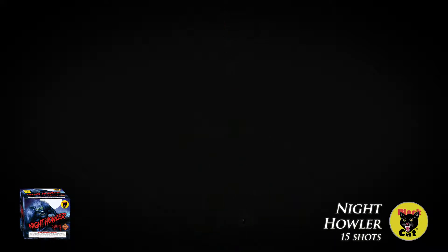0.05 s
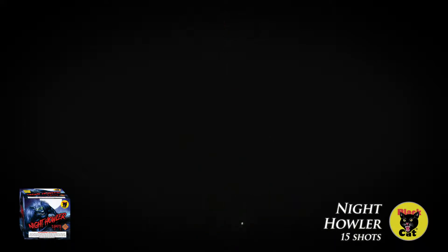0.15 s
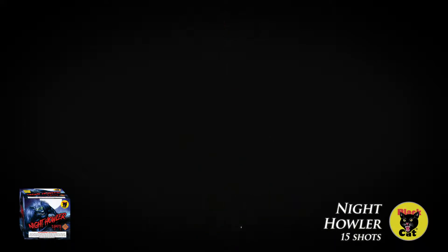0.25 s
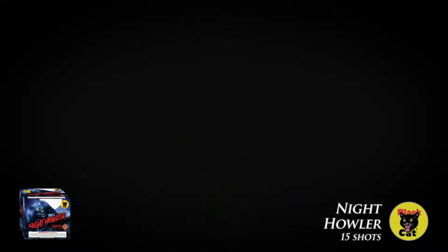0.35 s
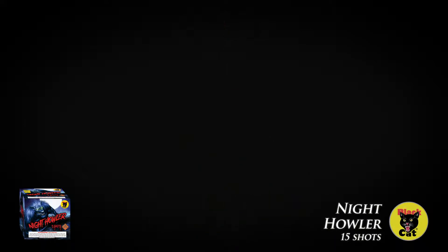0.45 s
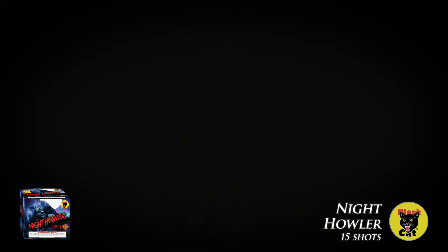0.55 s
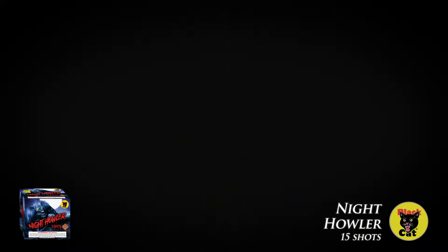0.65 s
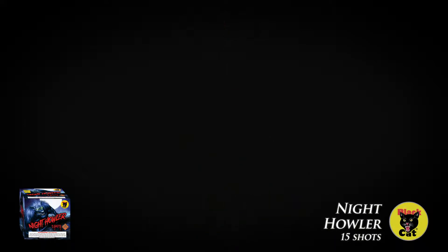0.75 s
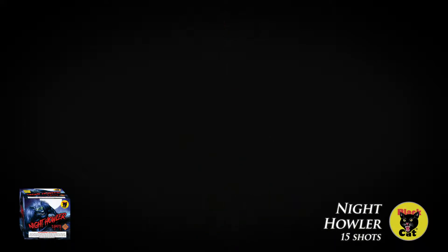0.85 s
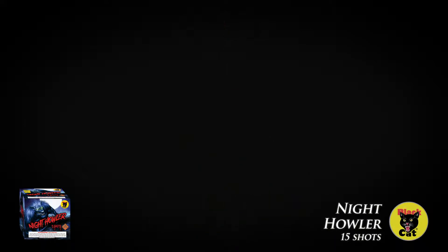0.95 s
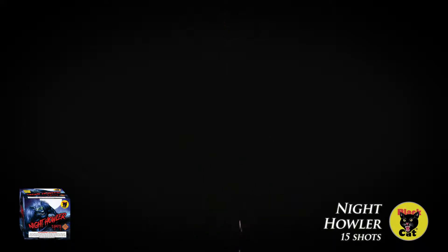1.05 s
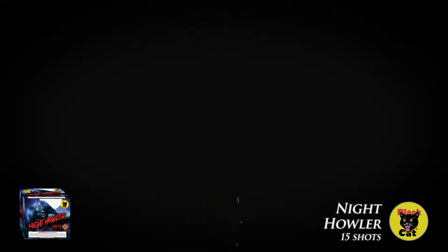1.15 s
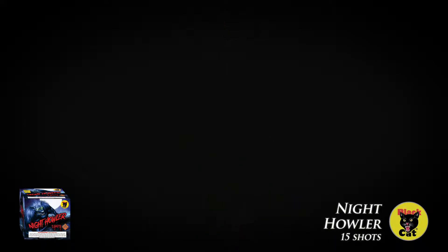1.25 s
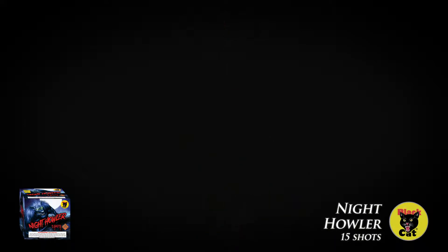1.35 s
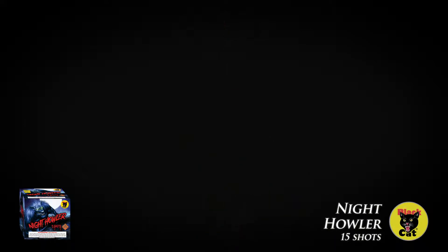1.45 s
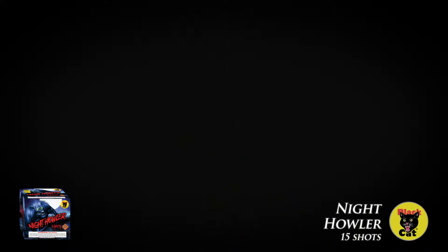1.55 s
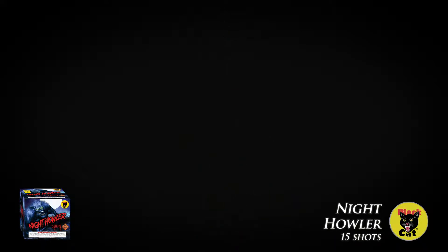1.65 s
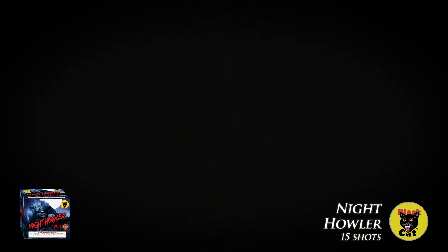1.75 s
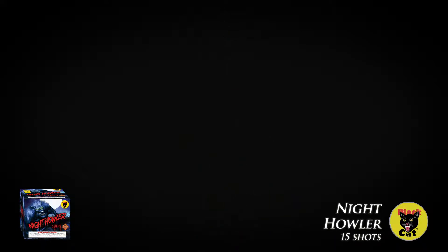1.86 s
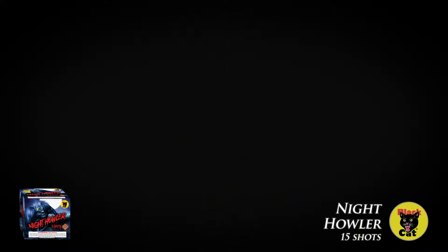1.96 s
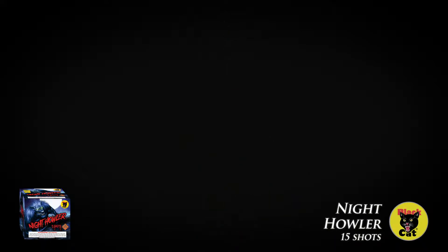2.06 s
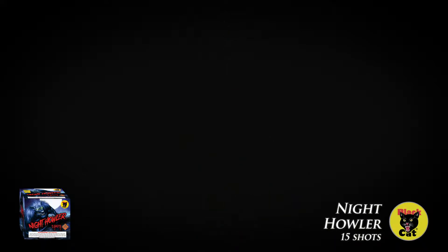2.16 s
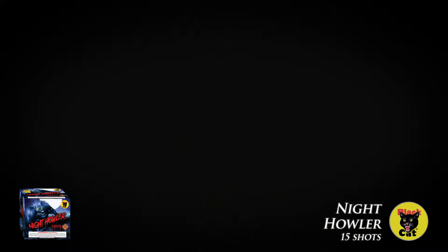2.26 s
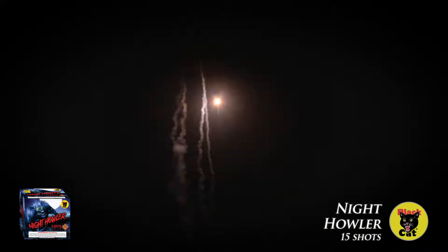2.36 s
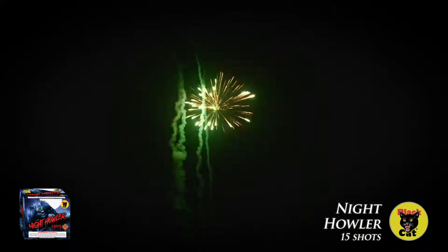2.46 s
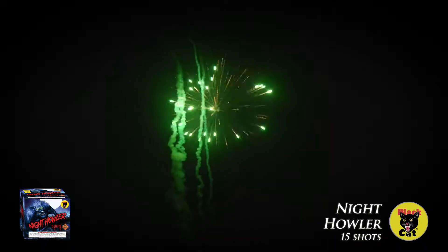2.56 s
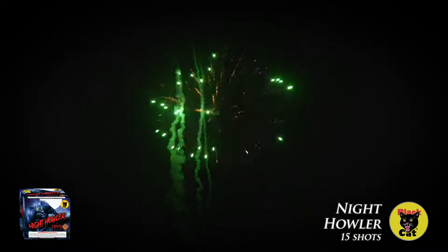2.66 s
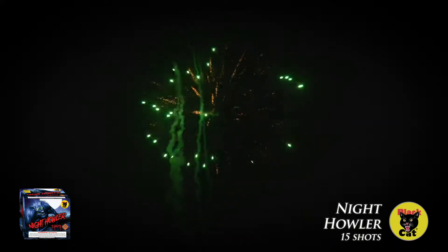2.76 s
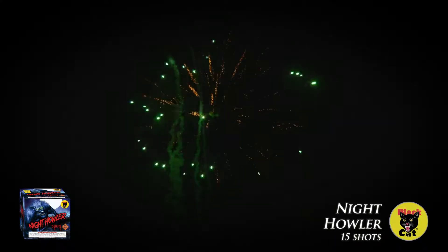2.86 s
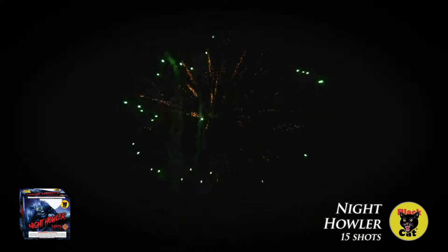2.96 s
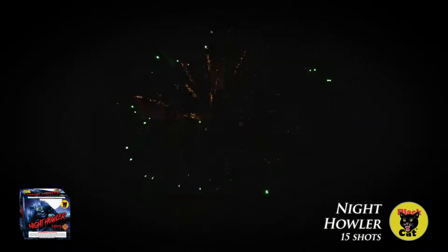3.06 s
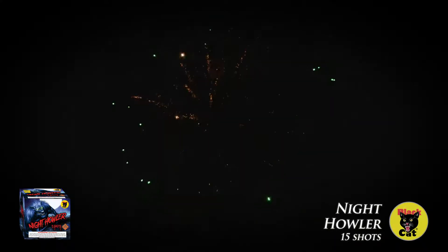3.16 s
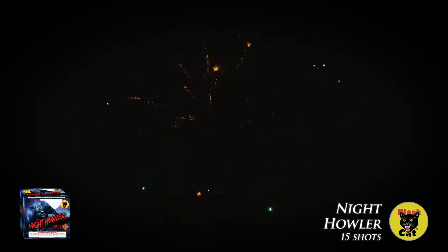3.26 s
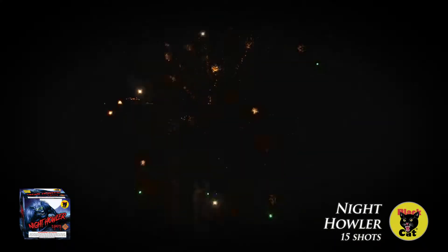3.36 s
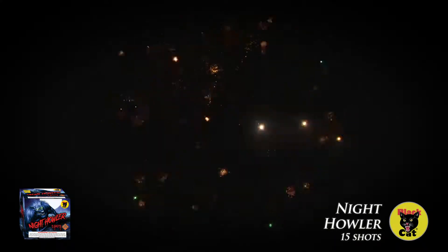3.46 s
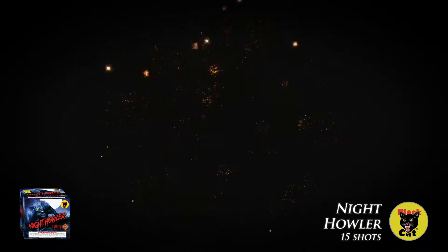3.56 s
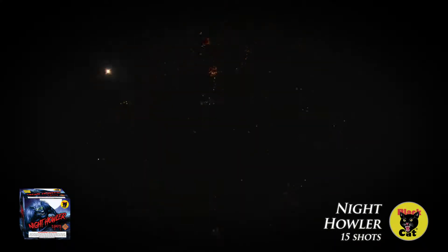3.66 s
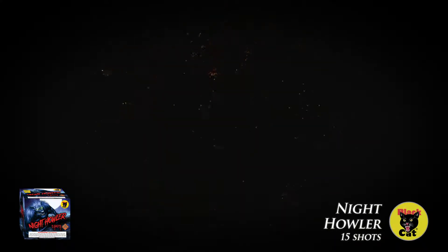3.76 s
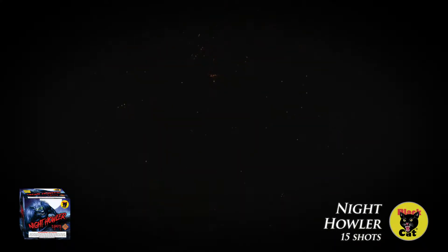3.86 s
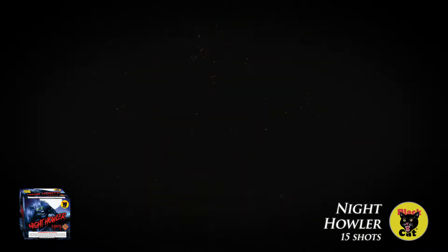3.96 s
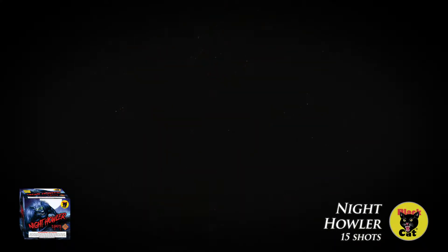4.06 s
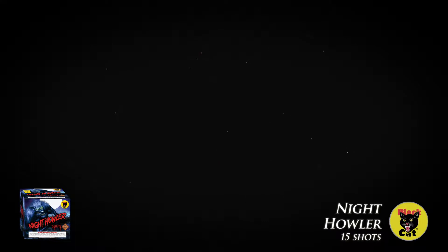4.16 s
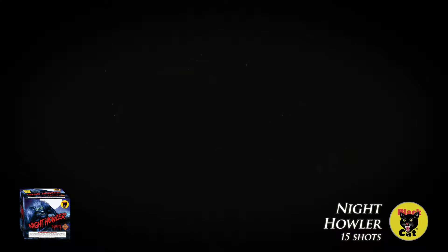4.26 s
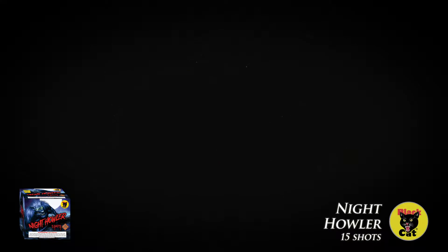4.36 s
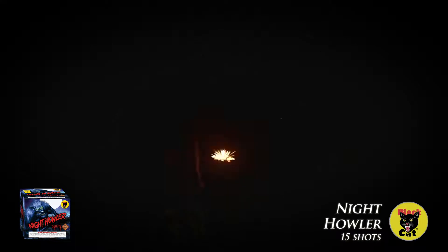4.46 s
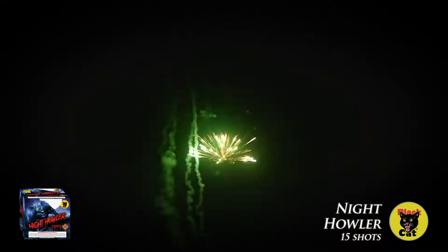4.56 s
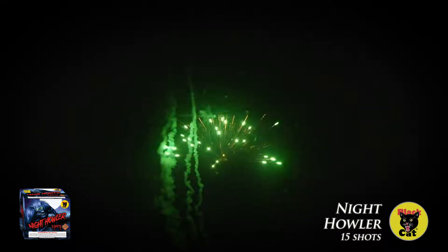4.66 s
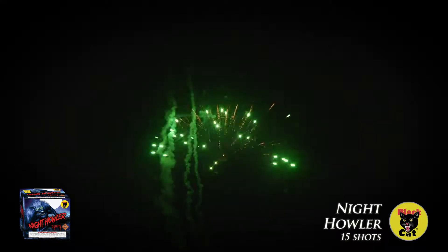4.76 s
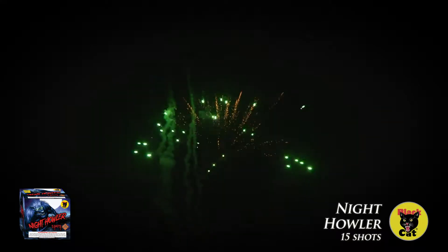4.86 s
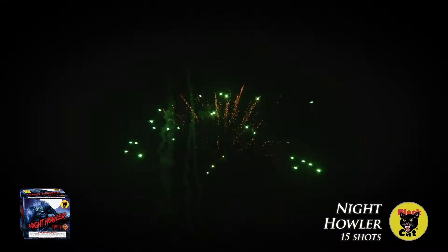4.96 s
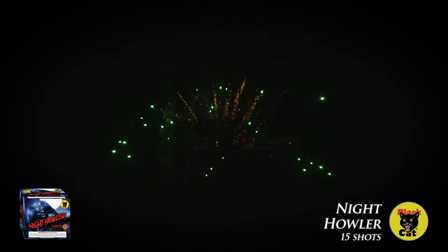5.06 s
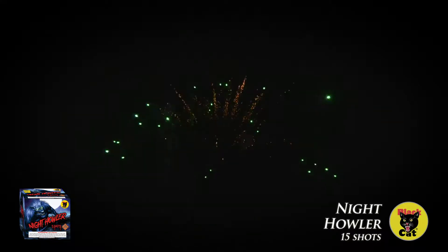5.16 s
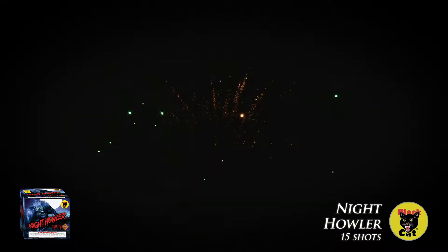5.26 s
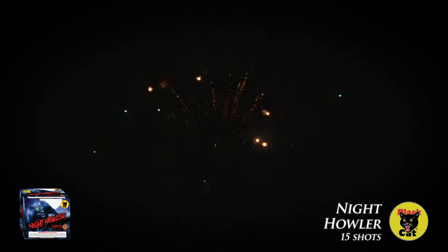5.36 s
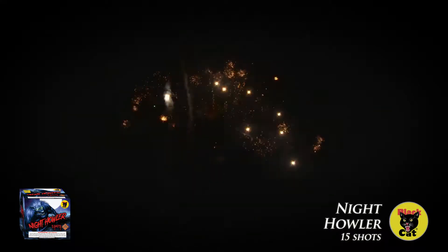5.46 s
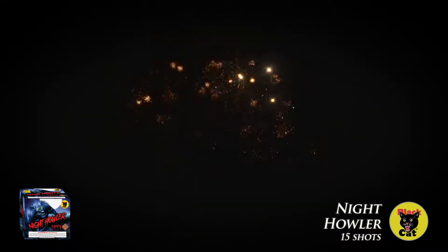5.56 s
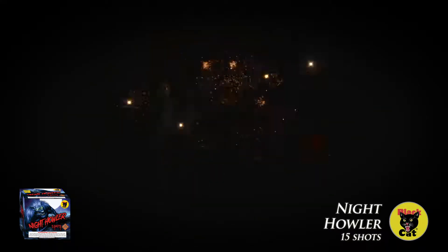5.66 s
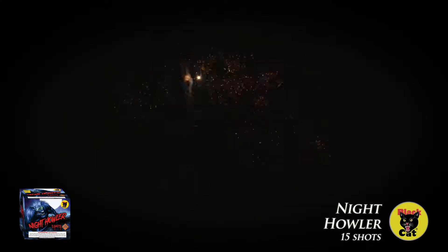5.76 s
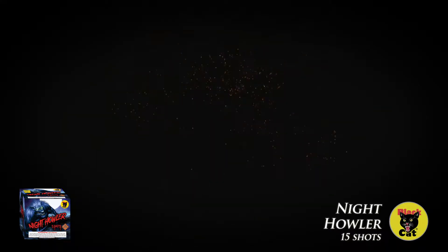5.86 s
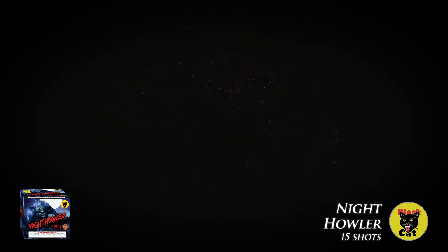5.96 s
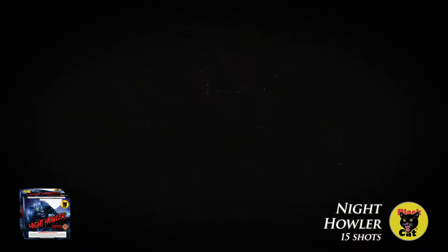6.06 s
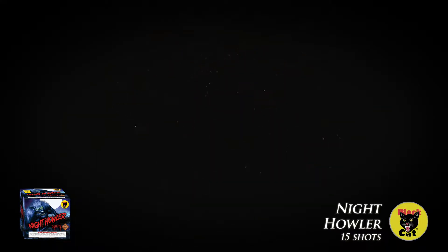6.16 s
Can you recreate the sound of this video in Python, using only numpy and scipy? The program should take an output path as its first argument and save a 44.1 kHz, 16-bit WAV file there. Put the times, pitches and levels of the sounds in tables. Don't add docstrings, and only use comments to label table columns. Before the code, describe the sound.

A fading whistle over night insects, then firework thumps, two huge overloaded bursts and dense sharp crackling, echoing across an open field.

```python
import sys
import numpy as np
from scipy import signal
from scipy.io import wavfile

SR = 44100
rng = np.random.default_rng(int(sys.argv[2]) if len(sys.argv) > 2 else 0)


def file_out(sig):
    cols = np.atleast_2d(sig).T
    lim = np.clip(cols, -1, 1)
    pcm = np.round(lim * 32767).astype(np.int16)
    wavfile.write(sys.argv[1], SR, pcm)


def magnitude_from_level(level_db):
    exponent = np.asarray(level_db, float) / 20
    return 10 ** exponent


N = 273420


def lifts():
    # f/Hz, level/dB per Hz, t60/s
    lift_return = [(70, -33, .7), (155, -33, 1.01), (276, -33.5, 0.88), (537, -44, 0.85),
                   (2450, -55.5, 0.86), (6100, -63, 1.2)]
    # delay t/s, level/dB, tilt/dB per octave, t60/s
    lift_echoes = [(0, 9, 1.5, 0.18), (.1, -4, 0, 0.36), (.17, -9, 0, 0.38), (.36, -20.5, 3, 1.41)]
    # f/Hz, level/dB
    lift_colour = [(40, -39), (70, 14.5), (130, 1), (220, 1.5), (400, -4), (900, 0), (3000, 2.5),
                   (6000, 0.5), (9000, -7), (15000, -35)]
    # f/Hz, level/dB per Hz, t60/s
    wall_return = [(151, -53.5, 0.34), (550, -65, 0.74), (2430, -63.5, 0.45), (6100, -85, 0.59)]
    # delay t/s, level/dB, tilt/dB per octave, t60/s
    wall_echoes = [(.018, 0, 0, 0.2), (.05, -24, -5, 2.8), (.235, -17, -4, .6), (.42, -32.5, -3.5, 0.42)]
    # f/Hz, level/dB
    wall_colour = [(40, -37), (120, 2), (260, 1), (450, -5.5), (900, -17), (1400, 2.5), (3000, 6.5),
                   (4500, 2.5), (7000, -25), (15000, -38)]
    # t/s, level/dB
    lift_times = [
        (1.1762, 0.75),
        (3.659, -3.0),
        (6.123, 0.3),
    ]
    wall_delay_s = 0.628

    thump = bang(lift_return, lift_echoes, lift_colour, 1.4,
                 air_db=17, lump_db=1.0, blast_ms=0.19, blast_db=1.5)
    add(thump, magnitude_from_level(-1.5) * tube(), 0.002)

    echo = bang(wall_return, wall_echoes, wall_colour, 1,
                air_db=15, lump_db=0.5, blast_ms=0.11, blast_db=-33)
    tube_echo = band_pass(tube()[:, :SR // 50], 202, 420, order=2)
    add(echo, magnitude_from_level(-17.5) * tube_echo, 0.001)
    face_slap = band_pass(np.pad(n_wave(0.15), (0, SR // 200)), 2000, 3600, order=2)
    add(echo, magnitude_from_level(1) * face_slap[None], 0.0016)

    out = np.zeros((2, N))
    for s, db in lift_times:
        add(out, magnitude_from_level(db) * thump, s)
        add(out, magnitude_from_level(db) * echo, s + wall_delay_s)
    return out


def tube():
    # f/Hz, level/dB, t60/s
    tube_modes = [(131, -2.5, 0.23), (216.5, -1.5, 0.23), (270, -3, 0.061), (676, -6.5, 0.069)]
    age = np.arange(SR // 2) / SR
    rings = sum(magnitude_from_level(db - 60 * age / t60) * np.sin(2 * np.pi * hz * age) for hz, db, t60 in tube_modes)
    return rings[None] * (1 - np.exp(-age / 0.00096))


def bursts():
    # f/Hz, level/dB per Hz, t60/s
    burst_return = [(148, -38.5, 1.4), (328, -36, 1.04), (544, -33, 0.93), (955, -39, 0.87),
                    (2521, -46.5, 0.86), (6300, -59.5, 1.82)]
    # delay t/s, level/dB, tilt/dB per octave, t60/s
    burst_echoes = [(.05, 2.5, -0.5, 0.89), (0.199, -13, -1, 4.8), (0.349, -12, 2.5, 0.59),
                    (.45, -9.5, 0.5, .6), (.59, -13, -1.5, 1.06)]
    # f/Hz, level/dB
    burst_colour = [(40, -14.5), (70, -8), (130, 9), (250, 4), (480, 2), (900, -1.5), (3000, 0),
                    (6000, 1.5), (9000, -2.5), (15000, -7)]
    # t/s, level/dB
    burst_times = [
        (2.6945, 0.3),
        (4.7692, 1.04),
    ]

    out = np.zeros((2, N))
    age = np.arange(round(0.034 * SR)) / SR
    ground = magnitude_from_level(6.0 - 60 * age / 0.035) * np.sin(2 * np.pi * 440 * age)
    for s, db in burst_times:
        burst = bang(burst_return, burst_echoes, burst_colour, 2.2,
                     air_db=28.5, lump_db=1.0, blast_ms=0.3, blast_db=-2.0)
        add(out, magnitude_from_level(db) * burst, s)
        add(out, magnitude_from_level(db) * ground[None], s + 0.0011)
    return out


def bang(answer, echoes, colour, length_s, air_db, lump_db, blast_ms, blast_db):
    echo_rise_s = 0.01
    age = np.arange(round(length_s * SR)) / SR
    lumps = np.clip(lump_db, 0, 3) * (drift(60, len(age)) + drift(9, len(age)))
    swells = []
    for delay, db, _, t60 in echoes:
        since = np.maximum(age - delay, 0)
        swells.append((1 - np.exp(-since / echo_rise_s)) * magnitude_from_level(2 * (db - 60 * since / t60)))

    def level(hz):
        power = magnitude_from_level(-120 * age / at_hz(answer, hz, column=2))
        octaves = np.log2(hz / 1000)
        power = power + sum(swell * magnitude_from_level(2 * row[2] * octaves) for swell, row in zip(swells, echoes))
        air_loss = air_db * age * max((hz / 6100) ** 2 - 1, 0)
        return 10 * np.log10(power) + at_hz(answer, hz) + at_hz(colour, hz) - air_loss + lumps

    fade_out = np.minimum((length_s - age) / 0.1, 1)
    sound = banded_noise(level, len(age)) * fade_out
    add(sound, magnitude_from_level(blast_db) * n_wave(blast_ms)[None], 0)
    return sound


def n_wave(ms):
    age = np.arange(round(ms * SR / 150)) / (ms * SR / 1000)
    return (1 - age) * np.exp(-age)


def stars():
    clicks = star_clicks()
    mono = clicks.mean(0)
    direct = signal.fftconvolve(clicks, star_crack(), axes=1)[:, :N]
    low_push = magnitude_from_level(10.5) * band_pass(mono, 60, 220, order=2)
    return direct + low_push + signal.fftconvolve(mono[None], star_field())[:, :N]


def star_clicks():
    # t/s, level/dB, left-right/dB
    first_pops = [(3.4513, -14, 1), (3.47, -20, 3), (3.4836, -10.5, -8), (3.5, -23.5, 0.5), (3.506, -22, 1),
                  (3.5366, -13, -4), (3.5481, -13.5, -1), (3.559, -24, -5), (3.5644, -16, 2),
                  (3.5695, -21, 6), (3.6136, -18, -7), (3.6216, -6.5, -2), (3.626, -2, 2), (3.64, -6.5, -4),
                  (3.6713, -2, 3), (3.6808, -17, 2), (3.711, -0.5, 2), (3.7362, -12, 0), (3.7699, 1, 2),
                  (3.7877, -10, -1), (3.8087, -9.5, -2), (3.8256, -4, -8), (3.8859, -20, -2),
                  (3.9023, -3, 4), (3.915, -12, 2), (3.924, -20, 2), (3.9386, -24, 2), (4.0251, -16, 11),
                  (4.03, -38, 10), (4.227, -50, 0)]
    # t/s, level/dB, left-right/dB
    second_pops = [(5.5868, -38, -5), (5.6208, -14.5, 2), (5.6285, -7.5, -5), (5.6349, -15, 3),
                   (5.6358, -14, 1), (5.6396, -20, 3), (5.6513, -10.5, 0), (5.6667, -3.5, 4),
                   (5.691, -15.5, 0), (5.6945, -17, 0), (5.7078, -7, 8), (5.7113, -6.5, -2),
                   (5.7227, -3, 2), (5.7454, -8.5, 1), (5.765, -4.5, 3), (5.799, 3, -6), (5.8604, -4, 2),
                   (5.8808, -7, 1), (5.923, -22, 1), (5.9416, -4, 0), (5.9644, -21.5, 3), (5.9762, -22, -8),
                   (5.9946, -2, 1), (6.006, -14, -7), (6.0297, -10, 8), (6.0409, -15, -1), (6.063, -33, -7),
                   (6.0662, -13.5, 9), (6.01, -19, -6), (6.1166, -17, -6)]
    # t/s, level/dB
    far_pops = [
        (3.4586, -10),
        (3.505, -5),
        (3.5778, 6.5),
        (4.0452, -1),
        (4.0594, -7),
        (4.0968, 1.5),
        (6.0971, 7),
    ]
    per_s, swarm_db = swarm()
    size_db = swarm_db + 3.5 * np.minimum(rng.exponential(1, N), 4)
    sway_db = 0.56 * rng.standard_normal(N) * [[1], [-1]]
    clicks = (rng.random(N) < per_s / SR) * magnitude_from_level(size_db + sway_db)

    s, db, pan_db = np.transpose(np.concatenate([first_pops, second_pops]))
    clicks[:, (s * SR).astype(int) - 4] += magnitude_from_level(db + 24.5 + pan_db / 2 * [[1], [-1]])

    s, db = np.transpose(far_pops)
    far = np.zeros(N)
    far[(s * SR).astype(int)] = magnitude_from_level(db + 5.0)
    return clicks + low_pass(far, 6800, order=4)


def swarm():
    # start t/s, rise/s, hold/s, fall/s, level/dB
    swarms = [
        (3.591, 0.06, 0.18, 0.14, -1.5),
        (5.612, 0.14, 0.2, 0.16, -5.5),
    ]
    peak_per_s, edge_db = 950, -21.5
    share, db = np.zeros(N), np.zeros(N)
    for s, rise, hold, fall, top_db in swarms:
        held = s + rise
        falling = held + hold
        shape = in_time([(s, 0), (held, 1), (falling, 1), (falling + fall, 0)])[0]
        share = share + shape
        db = np.where(shape > 0, top_db + edge_db * (1 - shape), db)
    return peak_per_s * share, db


def star_crack():
    age = np.arange(round(0.0046 * SR)) / SR
    scatter = rng.standard_normal((2, len(age))) + rng.standard_normal(len(age))
    crack = magnitude_from_level(-20.5) * band_pass(scatter * np.exp(-age / 0.0034), 3200, 7400, order=2)
    add(crack, n_wave(0.095)[None], 0)
    add(crack, magnitude_from_level(-13) * low_pass(n_wave(0.36), 5000)[None], 0.0019)
    return signal.lfilter(*signal.butter(1, 2500, "high", fs=SR), low_pass(crack, 6800, order=1))


def star_field():
    # f/Hz, level/dB per Hz, t60/s
    star_return = [(60, -19, .8), (150, -8.5, 1.4), (475, -5.5, 1.3), (1460, -7, 1.9), (3400, -13.5, 2.54),
                   (5400, -12, 1.73), (7740, -25, 1.3), (13900, -51, .4)]
    wall_delay_s, wall_db = 0.52, -17
    age = np.arange(round(1.6 * SR)) / SR

    def level(hz):
        return at_hz(star_return, hz) - 60 * age / at_hz(star_return, hz, column=2)

    field = banded_noise(level, len(age))
    field *= magnitude_from_level(-75.0) * (1 - np.exp(-age / 0.0038)) * (1 + 3.5 * np.exp(-age / 0.14))
    wall = band_pass(field, 1210, 2760, order=2)
    add(field, magnitude_from_level(wall_db) * wall[:, :len(age) - round(wall_delay_s * SR)], wall_delay_s)
    return field


def whistle():
    # t/s, lowest pitch f/Hz, spread of older echoes/Hz, level/dB
    climb = [(0, 2825, 37.4, -8.5), (.1, 2766, 60, -14), (.2, 2740, 108.9, -20), (.45, 2766, 162.2, -26.5),
             (.7, 2760, 217.7, -32.5), (.95, 2864, 305.6, -40.5), (1.17, 2934, 320, -41.5),
             (1.9, 2900, 150, -49), (2.7, 2970, 90.5, -74.5)]
    pitch, spread, db = in_time(climb)
    second_db = -2.5 + 0.53 * db
    third_db = -11.5 + 0.66 * db
    out = np.zeros((2, N))
    for older in np.linspace(0, 1, 12) ** 1.5:
        wobble = (25 + 0.125 * spread) * drift(48.1)
        turn = 2 * np.pi * (np.cumsum(pitch + older * spread + wobble) / SR + rng.random())
        dull = magnitude_from_level(-8 * older)
        tone = np.sin(turn) + dull * magnitude_from_level(second_db) * np.sin(2 * turn)
        tone += dull * magnitude_from_level(third_db) * (np.sin(3 * turn) + 0.055 * np.sin(4 * turn))
        side = rng.uniform(0, np.pi / 2)
        out += magnitude_from_level(-7 * older) * tone * [[np.cos(side)], [np.sin(side)]]

    noise = rng.standard_normal((2, N)) + 0.74 * rng.standard_normal(N)
    blur = band_pass(noise, 2750, 3160, order=2)
    blur += magnitude_from_level(second_db - 8.0) * band_pass(noise, 5000, 5100, order=2)
    blur_db = -12.5 - 18 * np.arange(N) / SR
    hiss = magnitude_from_level(db - 24.5) * band_pass(noise, 1640, 6200)
    return magnitude_from_level(db - 5.5) * out + magnitude_from_level(blur_db) * blur + hiss


def katydid():
    # f/Hz, width/Hz, level/dB, share that hums on between strokes
    wing_modes = [(8050, 370, -55, 0.54), (8630, 2040, -53, 0.23), (10400, 310, -73, .2)]
    t = np.arange(N) / SR
    sway = 0.27 * np.cos(2 * np.pi * (t - 3.2) / 4.6)
    stroke = 0.57 + 18.42 * t + sway
    phase = stroke % 1
    pressure = np.exp(-phase / 0.17) * np.minimum(phase / 0.086, 1)
    rasp = rng.standard_normal(N) + 0.53 * rng.standard_normal((2, N))
    rasp = rasp * (1 + 0.14 * np.cos(16 * np.pi * stroke))
    out = 0
    for hz, width, db, hum in wing_modes:
        ring = resonance(resonance(rasp * (hum + pressure), hz, width), hz, width)
        out = out + magnitude_from_level(db) * np.sqrt(SR / width) * ring
    return low_pass(out, 11700, order=6)


def cricket():
    # t/s, level/dB
    chirps = [
        (.248, -44.5),
        (.7, -50.5),
        (1.1, -52),
        (2.029, -55),
        (2.422, -59),
    ]
    # delay t/s, level/dB, f/Hz
    phrase = [
        (-.05, -13, 4170),
        (0, -4, 4200),
        (.055, -1, 4300),
        (.104, 0, 4330),
        (.156, 2, 4270),
    ]
    pulse_s = 0.036
    out = np.zeros((2, N))
    age = np.arange(round(pulse_s * SR)) / SR
    for s, db in chirps:
        for delay, step_db, hz in phrase:
            pitch = hz + 40 - 2500 * age + 70 * drift(250, len(age))
            husk = 1 + 0.3 * np.sin(2 * np.pi * 90 * age)
            swell = np.sqrt(np.sin(np.pi * age / pulse_s))
            pulse = np.sin(2 * np.pi * np.cumsum(pitch) / SR) * swell * husk
            add(out, magnitude_from_level(db + step_db) * pulse * magnitude_from_level(np.array([[0.5], [-0.5]])), s + delay)
    return out


def night():
    # f/Hz, level/dB per Hz
    night_hum = [(40, -49), (80, -8), (140, -6.5), (260, -18), (600, -23), (1400, -24.5), (2200, -35.5),
                 (4000, -32), (6000, -40.5), (9000, -52), (13000, -59)]
    return banded_noise(lambda hz: at_hz(night_hum, hz) - 47.5 - 16.5, N)


def banded_noise(density_db, size):
    # f/Hz, left-right likeness
    likeness = [(60, 0.96), (150, 1), (380, 0.9), (950, 0.73), (2380, 0.51), (5980, 0.78), (15000, 0.72)]
    band_edges = 35 * 2 ** np.arange(0, 9.1, 1 / 3)
    white = rng.standard_normal((2, 2, size))
    out = 0
    for k, (low, high) in enumerate(zip(band_edges, band_edges[1:])):
        mid, side = band_pass(white[k % 2], low, high)
        hz = np.sqrt(low * high)
        alike = np.clip(1.21 * at_hz(likeness, hz) - 0.2, 0, 1)
        pair = np.sqrt(1 + alike) * mid + np.sqrt(1 - alike) * side * [[1], [-1]]
        out = out + magnitude_from_level(density_db(hz)) * np.sqrt(SR) / 2 * pair
    return out


def at_hz(points, hz, column=1):
    points = np.array(points)
    return np.interp(np.log(hz), np.log(points[:, 0]), points[:, column])


def in_time(rows):
    s, *columns = np.transpose(rows)
    return [np.interp(np.arange(N) / SR, s, c) for c in columns]


def drift(rate_hz, size=N):
    r = np.exp(-2 * np.pi * rate_hz / SR)
    slow = signal.lfilter([1], [1, -2 * r, r * r], rng.standard_normal(size + 4000))[4000:]
    return slow / slow.std()


def resonance(x, hz, width_hz):
    r = np.exp(-np.pi * width_hz / SR)
    poles = [1, -2 * r * np.cos(2 * np.pi * hz / SR), r * r]
    return signal.lfilter((1 - r * r) / 2 * np.array([1, 0, -1]), poles, x)


def low_pass(x, hz, order=2):
    return signal.sosfilt(signal.butter(order, hz, fs=SR, output="sos"), x)


def band_pass(x, low_hz, high_hz, order=3):
    return signal.sosfilt(signal.butter(order, [low_hz, high_hz], "band", fs=SR, output="sos"), x)


def add(out, sound, s):
    at = round(s * SR)
    out[:, at:at + sound.shape[1]] += sound[:, :max(out.shape[1] - at, 0)]


def scene():
    return lifts() + bursts() + stars() + whistle() + katydid() + cricket() + night()


def roll_off(x):
    return signal.sosfilt(signal.butter(12, 16100, fs=SR, output="sos"), x)


def record(dry):
    capsule = signal.sosfilt(signal.butter(2, 75, "high", fs=SR, output="sos"), dry)
    leaning = capsule * magnitude_from_level(np.array([[-0.4], [0.4]]))
    rounded = leaning / (1 + np.abs(leaning / 0.9) ** 10.4) ** (1 / 9.3)
    tilted = signal.lfilter(*signal.butter(1, 130, "high", fs=SR), rounded)
    clipped = np.clip(low_pass(tilted, 15800, order=10), -1, 1)
    return roll_off(clipped)


dry = scene()
out = record(dry)
file_out(out)
```